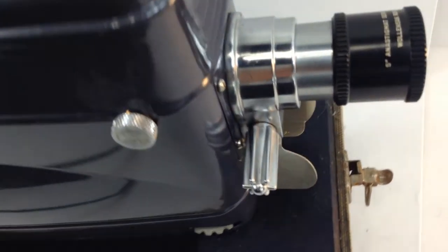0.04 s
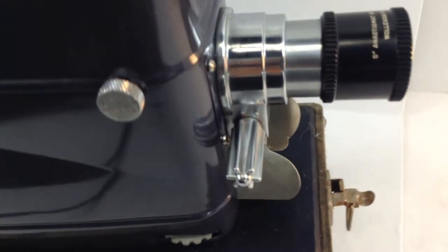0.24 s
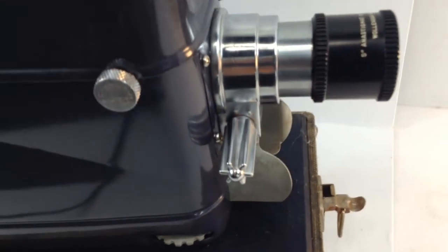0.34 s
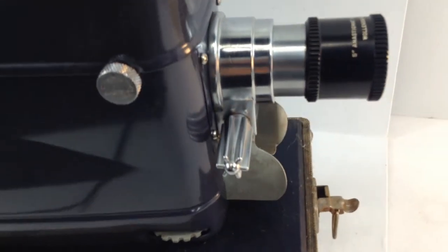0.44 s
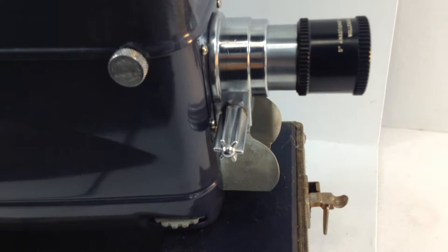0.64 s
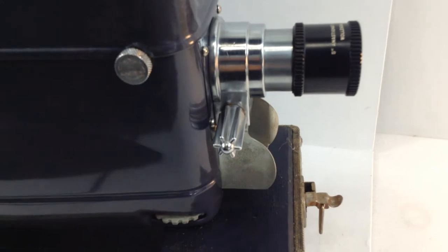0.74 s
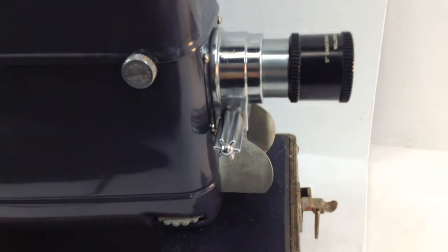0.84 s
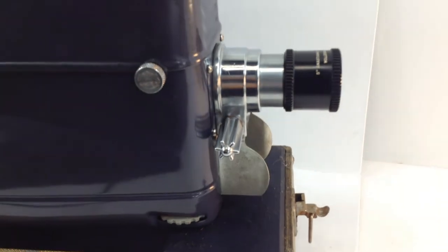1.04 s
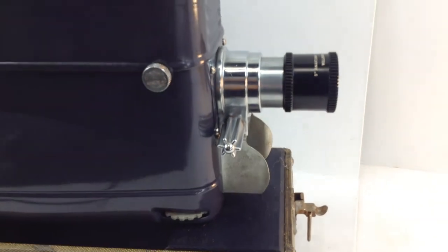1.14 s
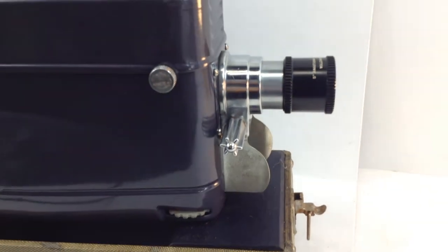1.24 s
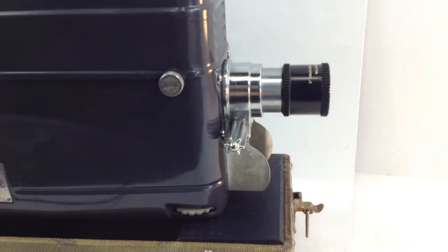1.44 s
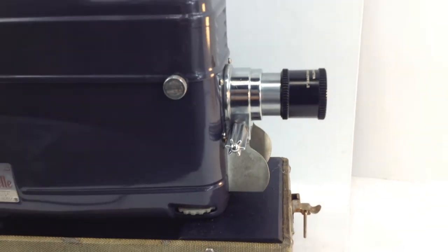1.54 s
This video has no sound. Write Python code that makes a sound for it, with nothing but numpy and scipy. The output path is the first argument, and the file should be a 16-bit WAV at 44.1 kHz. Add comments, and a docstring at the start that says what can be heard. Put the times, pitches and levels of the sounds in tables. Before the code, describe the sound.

A film projector runs indoors with a throbbing motor hum, rushing fan and thin whine. One sharp, dry click sounds close by early on. The fan softens slightly as the microphone backs away, and two faint ticks follow.

```python
"""A motor hum throbs ten times a second: a film projector runs indoors, with mains hum, a thin whine
and the rush of its cooling fan. One sharp, dry click sounds close by with a quick echo off a wall,
the air swells briefly, and later the mechanism ticks faintly twice. The microphone backs away from the
housing, so the fan's whirr thins and grows softer, its whistle fades and the whine comes forward."""
import sys
import numpy as np
from scipy import signal
from scipy.fft import rfft, irfft, next_fast_len
from scipy.io import wavfile
from scipy.ndimage import map_coordinates

SR = 44100
rng = np.random.default_rng(int(sys.argv[2]) if len(sys.argv) > 2 else 0)


def waveform_to_disk(signal):
    """Save audio, clipped to [-1, 1], as 16-bit WAV at the path in sys.argv[1]."""
    frames = np.transpose(np.atleast_2d(signal))
    scaled = np.clip(frames, -1, 1) * 32767
    samples = np.round(scaled).astype(np.int16)
    wavfile.write(sys.argv[1], SR, samples)


N = 70560
SHAFT_HZ, MAINS_HZ = 55.06, 60


# The motor's weaker overtones. Each row: shaft harmonic, mid-scene level in dB, drift in dB a second.
SHAFT_OVERTONES = [(3, -69, -8), (5, -80, 11), (6, -74, -3), (7, -73.5, -5), (8, -67, -2.5), (13, -68.5, 1)]

def motor():
    """The shaft's strong fourth harmonic beats with the drive; weaker overtones pulse along."""
    beat = 1 + 1.58 * throb()
    out = receding(-53, db_per_s=2) * beat * tone(4 * SHAFT_HZ, waver_db=.4, waver_rad=.057)
    pulse = 1 + .31 * throb()
    for harmonic, db, drift in SHAFT_OVERTONES:
        out += receding(db, drift) * pulse * tone(harmonic * SHAFT_HZ, waver_db=4, waver_rad=.3)
    return out


# The electrical hum. Each row: mains harmonic, mid-scene level in dB, drift in dB a second.
HUM_PARTIALS = [(2, -66.5, -1.5), (8, -58, -7)]

def mains_hum():
    """Smooth magnetic hum on even harmonics of the mains."""
    return sum(receding(db, drift) * tone(harmonic * MAINS_HZ, waver_db=0, waver_rad=.033)
               for harmonic, db, drift in HUM_PARTIALS)


# The whine. Each row: shaft harmonic, mains harmonic, mid-scene level in dB, drift in dB a second.
WHINE_PARTIALS = [(17, 0, -64.5, 1.5), (16, 2, -65, 1), (17, 2, -65, 8), (17, 4, -68, -0.5),
                  (17, 6, -74.5, 9)]

def slot_whine():
    """The motor's slots sing thinly at sums of shaft and mains harmonics, pulsing with the drive."""
    pulse = 1 + .29 * throb(lead_s=.045)
    out = np.zeros(N)
    for shaft, mains, db, drift in WHINE_PARTIALS:
        hz = shaft * SHAFT_HZ + mains * MAINS_HZ
        out += receding(db, drift) * pulse * tone(hz, waver_db=.7, waver_rad=.26)
    return out


# The low body of the fan's air. Each row: frequency in Hz, relative level in dB.
DRAUGHT_COLOUR = [(30, -30), (90, -24), (150, -3.5), (260, -3), (340, 3.5), (470, -0.5), (570, -5),
                  (740, -3.5), (1100, -6.5), (1550, -9.5), (2400, -11), (3000, -33), (6000, -49)]

def draught():
    """The fan pushes air through the housing, churning gently with the throb."""
    churn = 1 + .11 * throb(lead_s=.026)
    return receding(-53, db_per_s=-1) * noise(DRAUGHT_COLOUR) * churn


# The housing's air resonances. Each row: pitch in Hz, nominal width in Hz, mid-scene level in dB
# before the swell, drift in dB a second.
HOUSING_RESONANCES = [(472, 45, -63, -4), (729, 54, -61.8, -5.5), (996, 82, -70, 5), (1296, 87, -67.5, -4),
                      (1805, 130, -64, -6), (1970, 150, -66.5, 2), (2185, 67, -67.5, -5),
                      (2287, 92, -66.5, -6), (2550, 460, -73.5, 2), (3160, 73, -72, 2),
                      (3393, 140, -72.5, 1), (4090, 140, -75, 5), (4560, 210, -70, -1)]

def whirr():
    """Air flutters in the housing's resonances, which rise and fall in one slow swell."""
    out = np.zeros(N)
    for hz, width, db, drift in HOUSING_RESONANCES:
        band = resonant_noise(hz, width * np.sqrt(2))
        flutter = amp(1.8 * wobble(per_s=14))
        out += receding(db, drift) * band * flutter
    return out * amp(2.5 * (swell(width_s=.38) - .5))


# The bright air at the vents. Each row: frequency in Hz, relative level in dB.
VENT_COLOUR = [(1530, -61), (2600, -4), (3240, 0), (3720, -3.5), (4600, -2.5), (5000, -5.5), (5500, -3),
               (7580, -4), (8600, -11), (9800, -12.5), (15000, -24)]

def vent_hiss():
    """Air hisses out of the vents, flickering slightly, with one brief surge."""
    hiss = receding(-59, db_per_s=-2) * noise(VENT_COLOUR)
    flicker = amp(.45 * wobble(per_s=21.3))
    surge = amp(-57.5) * swell(width_s=.072) * noise(VENT_COLOUR)
    return hiss * flicker + surge


# The whistle's fader moves. Each row: time in seconds, level in dB.
WHISTLE_FADER = [(0, -69), (.18, -61.5), (.68, -60.5), (.82, -70), (1.6, -72)]

def whistle():
    """Air whistles at a vent, pulsing with the drive and fading as the microphone leaves its path."""
    times, db = np.transpose(WHISTLE_FADER)
    pulse = 1 + .35 * throb(lead_s=.04)
    return amp(np.interp(clock(), times, db)) * pulse * tone(2193, waver_db=2.2, waver_rad=2)


# The clicking part's hollow body and its bright rattle. Each row: frequency in Hz, relative level in dB.
BODY_COLOUR = [(50, -36), (160, -26), (380, -16), (505, -5.5), (640, -14.5), (810, -6.5), (1040, -29),
               (1250, -15.5), (1750, -5.5), (1950, -6.5), (2300, 0.5), (2700, 1), (3300, -7.5),
               (3950, -12.5), (4380, -28), (4700, -21.5), (5600, -17.5), (6900, -18), (7600, -33),
               (9000, -37), (9800, -26.5), (11800, -39.5), (13500, -25), (15500, -51)]
RATTLE_COLOUR = [(800, -15), (2500, -4), (7000, -1), (10000, -9), (15000, -13)]

def click(start_s=.22475):
    """A heavily damped part snaps, rattles and seats with a tiny rebound; the room answers faintly."""
    snap = -amp(-40) * np.pad(struck(BODY_COLOUR), (round(start_s * SR), 0))[:N]
    room_tail = rng.standard_normal(N) * decay(start_s=.0073, t60_s=.051)
    room = amp(-32) * signal.fftconvolve(snap, room_tail / np.linalg.norm(room_tail))[:N]
    rattle = amp(-35.5) * decay(start_s, t60_s=.015) * noise(RATTLE_COLOUR)
    rebound = burst(start_s=.2268, db=-35.5, hz=6900, t60_s=.006)
    return snap + rattle + rebound + room


# One echo, then two ticks. Each row: start in seconds, level in dB, pitch in Hz, seconds to fall 60 dB.
ECHO_AND_TICKS = [(0.2354, -46, 5560, 0.024), (1.249, -47, 5200, .019), (1.45, -47, 2200, 0.019)]

def echo_and_ticks():
    """The click's quick echo off a wall, then two faint mechanism ticks, each a short noise burst."""
    return sum(burst(*row) for row in ECHO_AND_TICKS)


# The bed of hiss. Each row: frequency in Hz, relative level in dB.
BED_COLOUR = [(1500, -33), (4000, -6), (10000, -3.5), (15000, -11)]

def hiss_bed():
    """A faint, steady hiss behind everything."""
    return amp(-68) * noise(BED_COLOUR)


def throb(lead_s=0, hz=9.87, peak_s=.1005):
    """The slow cycle of the drive, -1 to 1."""
    return np.cos(2 * np.pi * hz * (clock() + lead_s - peak_s))


def receding(db, db_per_s):
    """Gain that is db at mid-scene and drifts as the microphone backs away."""
    return amp(db + db_per_s * (clock() - N / SR / 2))


def swell(width_s, peak_s=.533):
    """A smooth hump of height 1."""
    return np.exp(-((clock() - peak_s) / width_s) ** 2)


def decay(start_s, t60_s):
    """An instant attack that falls 60 dB in t60_s."""
    age = clock() - start_s
    return (age > 0) * amp(-60 * np.maximum(age, 0) / t60_s)


def tone(hz, waver_db, waver_rad):
    """A sine of rms about 1, wavering in level and phase."""
    phase = 2 * np.pi * (hz * clock() + rng.random()) + waver_rad * wobble(per_s=9.63)
    return np.sqrt(2) * np.sin(phase) * amp(waver_db * wobble(per_s=7.42))


def burst(start_s, db, hz, t60_s):
    """A brief burst of noise in a broad band around one pitch."""
    return amp(db) * decay(start_s, t60_s) * resonant_noise(hz, width=.65 * hz)


def struck(colour):
    """The ring of a struck body with this colour; rms 1 over the scene."""
    spectrum = eq_gain(colour, np.fft.rfftfreq(N, 1 / SR))
    cepstrum = irfft(np.log(spectrum), N)
    # Minimum phase packs the energy into the attack.
    cepstrum[1:N // 2] *= 2
    cepstrum[N // 2:] = 0
    return unit(irfft(np.exp(rfft(cepstrum)), N))


def noise(colour):
    """Coloured noise of rms 1."""
    return unit(filtered(rng.standard_normal(N), lambda f: eq_gain(colour, f)))


def resonant_noise(hz, width):
    """Noise of rms 1 in one steep-sided resonance."""
    def resonance(f):
        return (1j * f * width / (hz * hz - f * f + 1j * f * width)) ** 2
    return unit(filtered(rng.standard_normal(N), resonance))


def eq_gain(colour, f):
    """Gain at frequencies f of an EQ curve drawn through (Hz, dB) points."""
    hz, db = np.transpose(colour)
    return amp(np.interp(np.log(f + 1), np.log(hz + 1), db))


def filtered(x, response):
    """x shaped by a frequency response."""
    size = next_fast_len(N + SR // 2)
    return irfft(rfft(x, size) * response(np.fft.rfftfreq(size, 1 / SR)), size)[:N]


def wobble(per_s):
    """A smooth random curve through per_s points a second."""
    return map_coordinates(rng.standard_normal(256), [clock() * per_s + 2], mode="wrap")


def amp(db):
    """Decibels to gain."""
    return 10 ** (np.asarray(db) / 20)


def unit(x):
    """Scale to rms 1."""
    return x / np.sqrt(np.mean(x ** 2) + 1e-20)


def clock():
    """Time of each sample in seconds."""
    return np.arange(N) / SR


def scene():
    """The mono mix: drive, fan, click, echo and ticks over the bed of hiss."""
    drive = motor() + mains_hum() + slot_whine()
    fan = draught() + whirr() + vent_hiss() + whistle()
    return (drive + fan + click() + echo_and_ticks() + hiss_bed())[None]


def record(dry):
    """A hard high cut at 15.5 kHz."""
    return np.array([filtered(channel, lambda f: f < 15500) for channel in dry])


dry = scene()
out = record(dry)
waveform_to_disk(out)
```